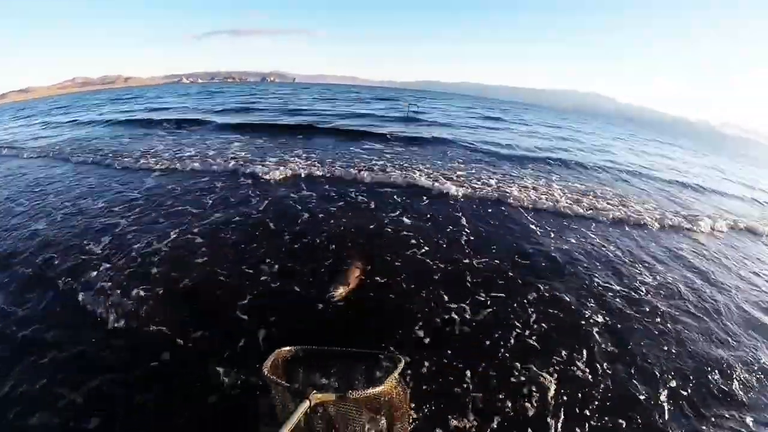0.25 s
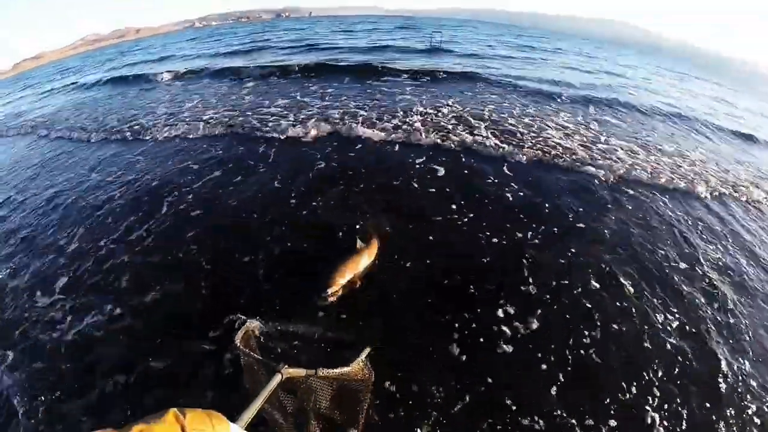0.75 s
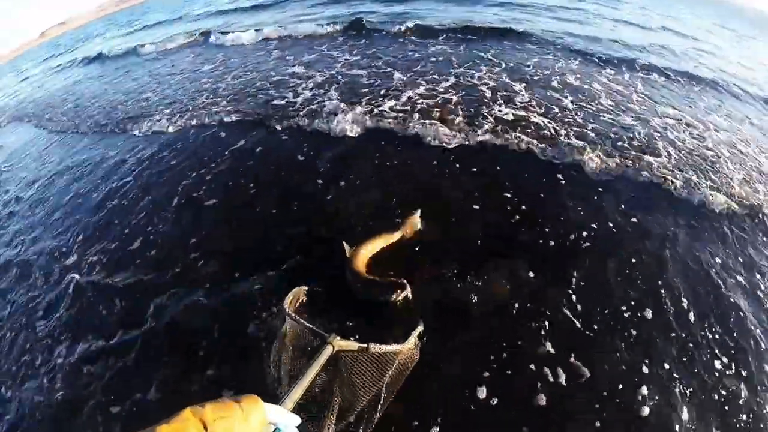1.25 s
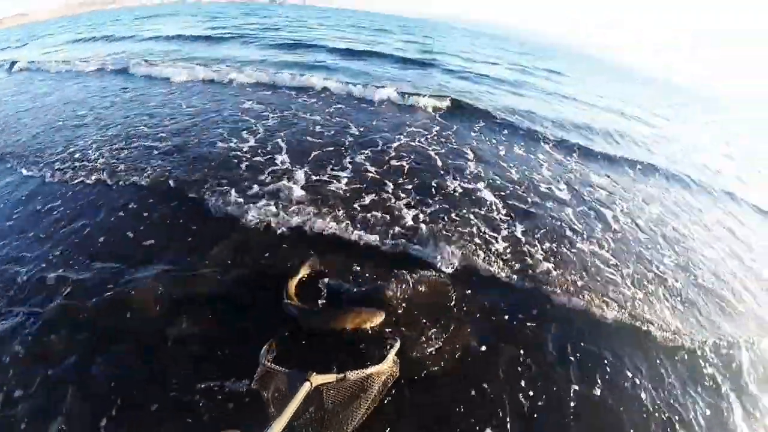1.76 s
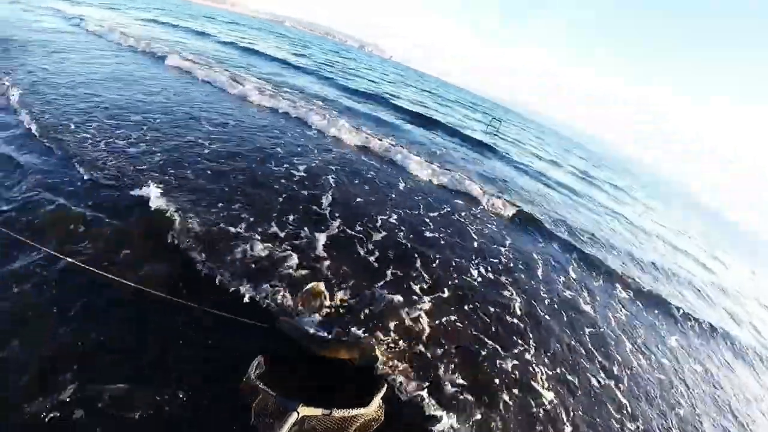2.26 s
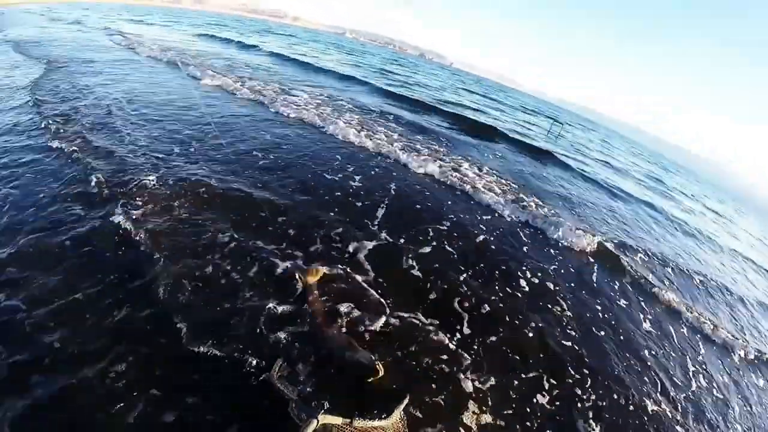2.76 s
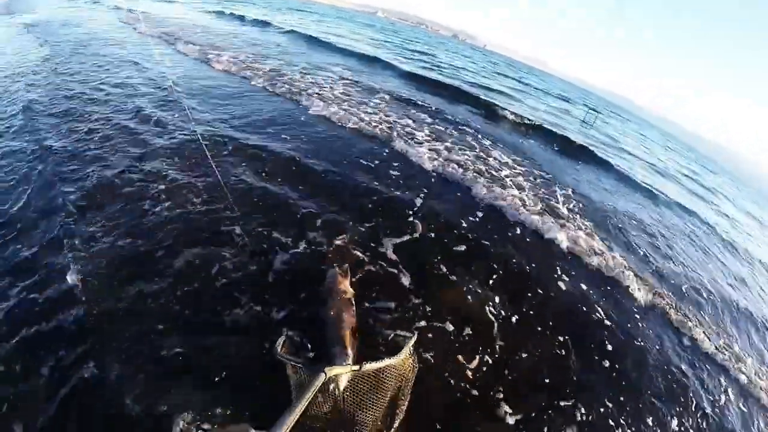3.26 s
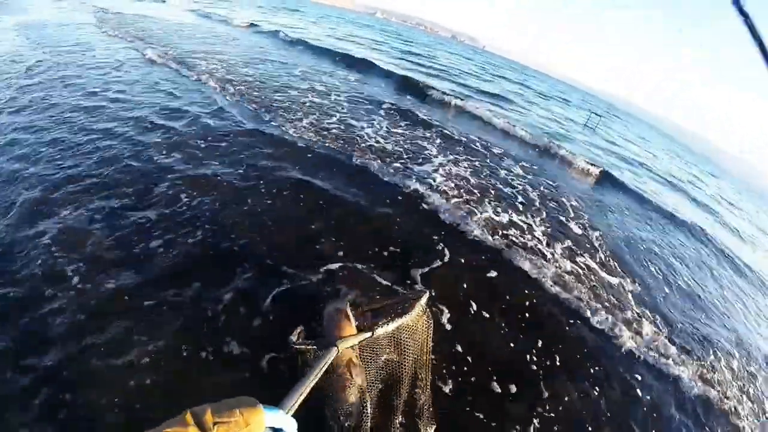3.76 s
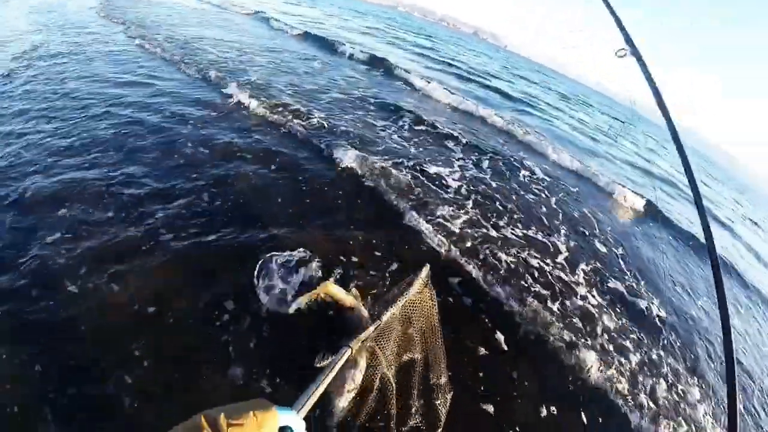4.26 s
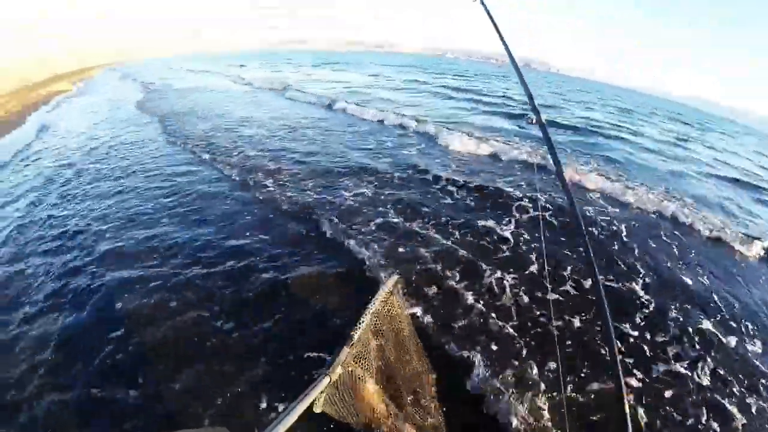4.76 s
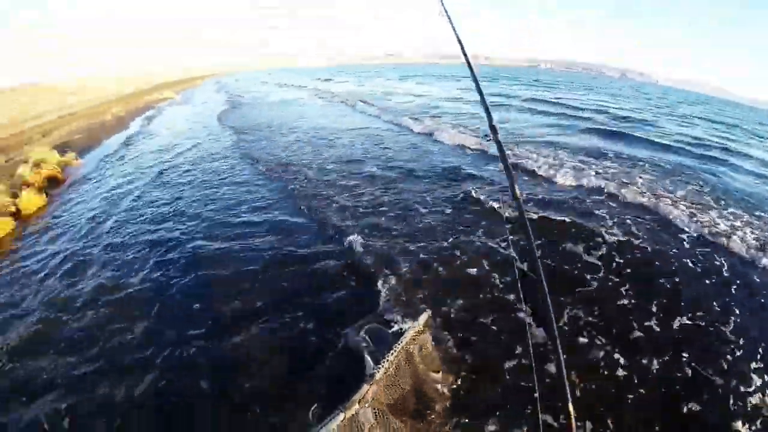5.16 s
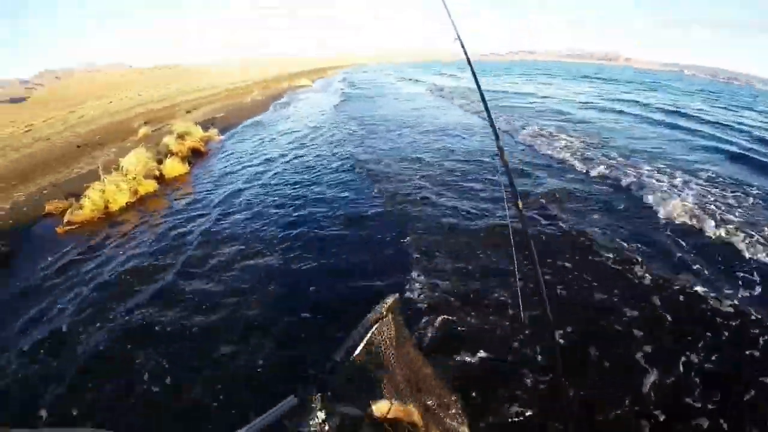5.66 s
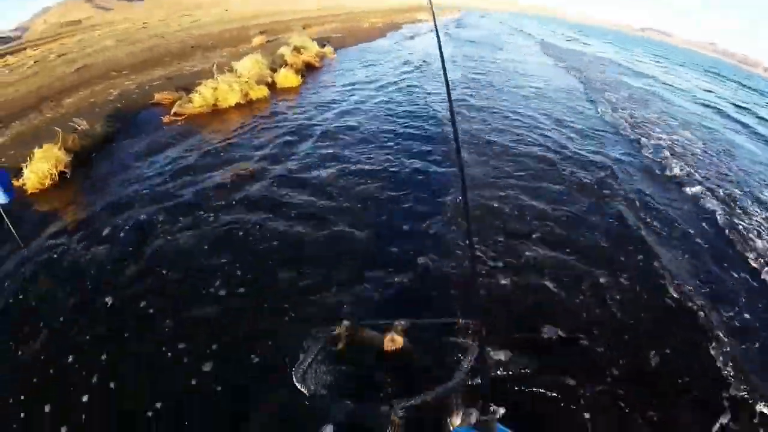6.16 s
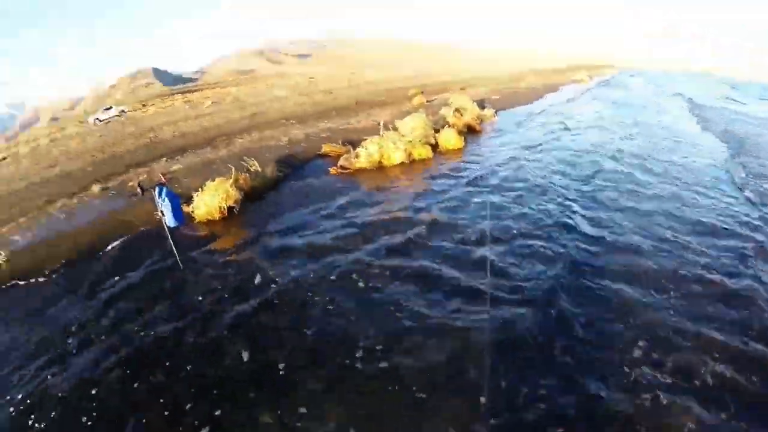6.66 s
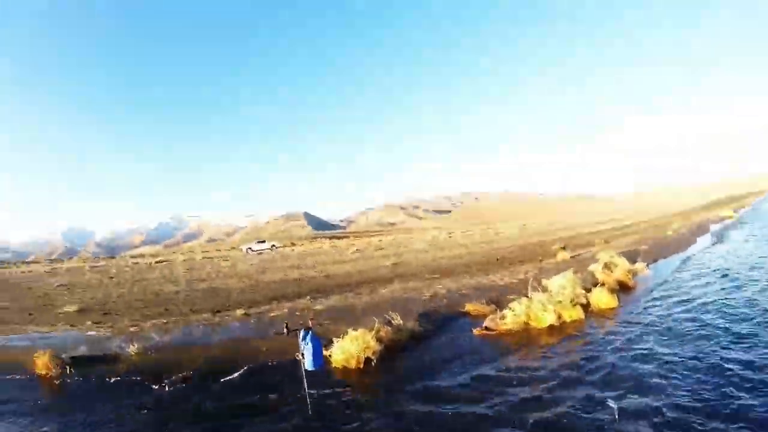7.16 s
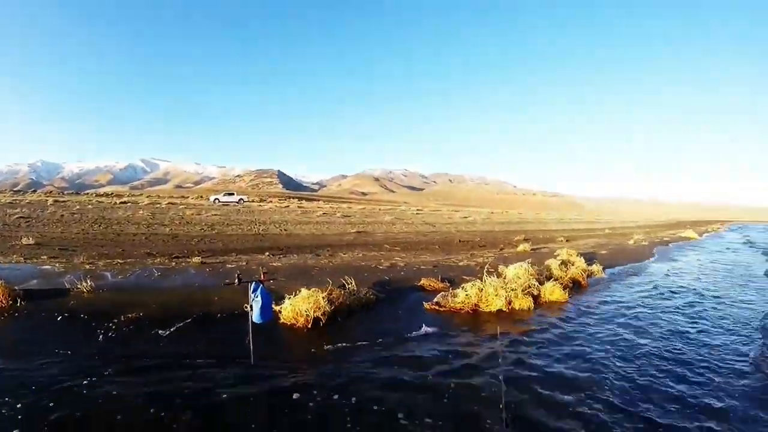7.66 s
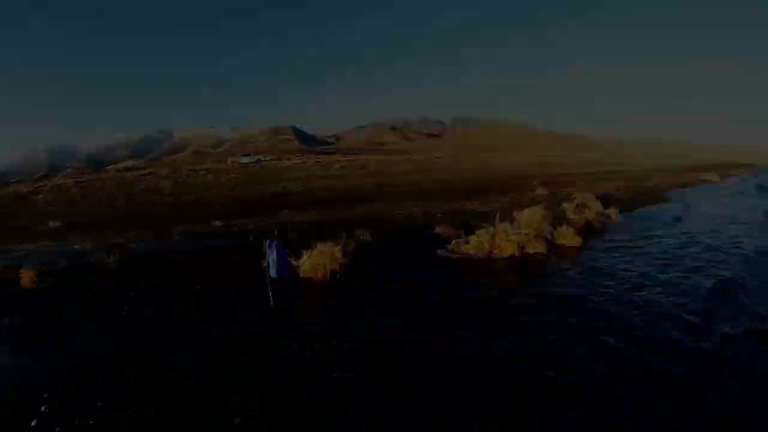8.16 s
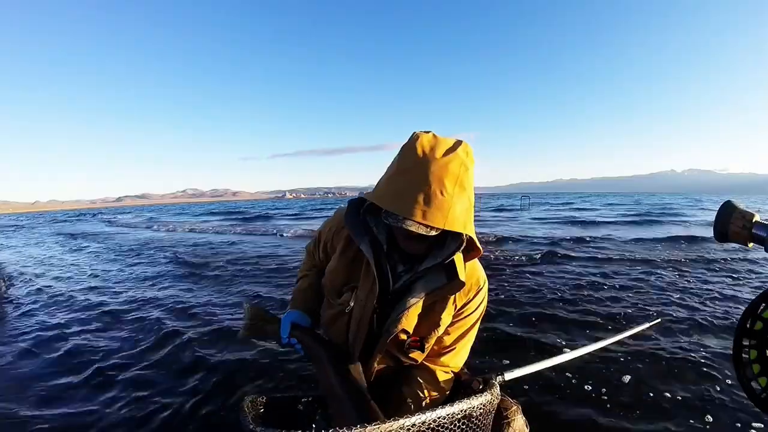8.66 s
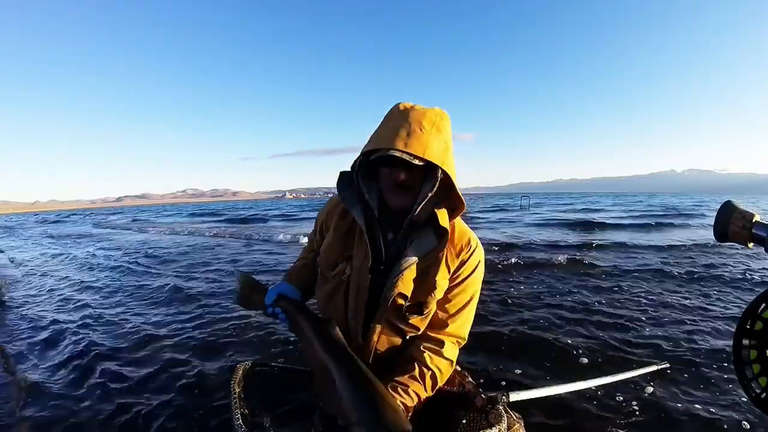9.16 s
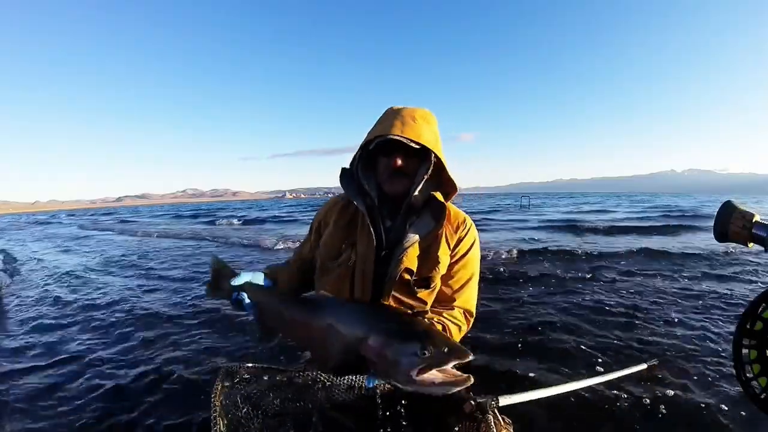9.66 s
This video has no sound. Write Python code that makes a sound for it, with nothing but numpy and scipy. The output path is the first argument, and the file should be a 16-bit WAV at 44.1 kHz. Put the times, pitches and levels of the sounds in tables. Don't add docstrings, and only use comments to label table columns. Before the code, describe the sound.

Foamy wavelets wash, splash and fizz around a wader while wind thumps a sealed microphone, then a quick fade gives way to softer water.

```python
import sys
import numpy as np
from scipy import signal
from scipy.io import wavfile
from scipy.ndimage import uniform_filter1d

SR = 44100
rng = np.random.default_rng(int(sys.argv[2]) if len(sys.argv) > 2 else 0)


def dump_mix(stems):
    frames = np.atleast_2d(stems).T
    limited = np.clip(frames, -1, 1)
    pcm = np.round(limited * 32767).astype(np.int16)
    wavfile.write(sys.argv[1], SR, pcm)


def voltage_ratio(decibels):
    exponent = np.asarray(decibels, float) / 20
    return 10 ** exponent


N = 437028

TURN_START_S, TURN_END_S = 5.33, 6.16
LOW_TURN_S = 4.63
CUT_S = 8.41
END_S, END_DB = 9.87, -4

# pitch in Hz, level in dB per Hz.
SURF_TONE = [(110, -42), (190, -1), (340, 2), (720, -4), (1150, -5.5), (1400, -15), (2130, -7),
             (2870, -13.5), (4290, -20), (5000, -14), (6050, -7), (7800, -11.5), (9600, -18), (12500, -40)]
SHORE_TONE = [(110, -16.5), (190, -2), (516, -1.5), (903, -3.5), (1480, -10.5), (2210, -6.5), (4370, -20),
              (5000, -14.5), (6050, -8), (7300, -12), (9000, -15.5), (12500, -44)]
CALM_TONE = [(110, -26), (190, -23), (222, -1.5), (464, -2.5), (842, -3), (1500, -12), (3420, -21.5),
             (4290, -30), (5000, -20), (6050, -16), (7500, -11), (9000, -17.5), (12500, -48)]
# pitch in Hz, width in Hz, lift in dB at the surf, shore and calm spot.
CASE_RINGS = [
    (5540, 620, 7, 6, 4.6),
    (6510, 340, 7.5, 10.6, 12.7),
    (7010, 960, 2, 1.3, 4.9),
    (6900, 410, 0.2, 1.5, 3.1),
]
# wash, splash and fizz in dB.
WATER_LEVELS = [
    (-43.5, -46.5, -45),
    (-49, -55, -52),
    (-47.5, -57.5, -52),
    (-55, -58.5, -55.5),
]
FOAM_FOLLOW = (1, 1.3, 1.35)
SHADE_START_S = (5.43, 5.55, 5.7)
# time in seconds, level in dB.
NEAR_FOAM = [(0, 1), (0.4, -1.5), (0.9, 0.5), (1.3, -1), (1.86, -0.5), (2.6, -.5), (3.1, -3), (3.6, -1),
             (4.3, 0.5), (5.0, 0), (5.6, -1), (6.0, 0), (6.6, 1), (7.3, 0), (7.9, 0.5), (8.45, -0.5),
             (9.2, 0.5), (9.7, 1.5)]
# middle in seconds, length in seconds, lift in dB, share reaching the splash (0-1).
FOAM_SURGES = [(0.1, 0.13, 3, 0.2), (0.22, 0.11, 4, 0), (0.425, 0.21, 5.5, 0.05), (0.6, 0.22, 4.5, 0.1),
               (0.88, 0.08, 7, 0), (0.96, 0.12, 7, 0.6), (1.728, 0.14, 5, 0.7), (1.996, .14, 0.5, 0.9),
               (2.25, 0.21, 7, 0.14), (2.386, 0.093, 5, 0.2), (2.674, 0.079, 5, 0.4), (2.877, 0.17, 5, 0.5),
               (3.33, 0.09, -1.5, 0.2), (3.454, .08, -0.5, .6), (3.967, 0.06, 2.5, 1), (4.138, 0.21, 2, .8),
               (4.45, 0.3, 4, 0.64), (4.74, 0.11, 3.5, 1), (5.229, 0.12, 1.5, 0.1), (5.413, 0.42, 4, 0),
               (5.55, .1, 0.5, 0.1), (5.717, 0.27, 3, 0.6), (5.875, 0.31, 3, 0.4), (6.273, 0.19, 2, 1),
               (6.946, 0.14, 3.5, 0.5), (7.07, 0.088, 1.5, .3), (7.68, .12, 2.5, 0), (7.8, 0.094, 1, 0),
               (8.62, .08, 4.5, 0), (9.57, 0.38, 3.5, 0.4)]
# middle in seconds, length in seconds, lift in dB.
LEG_LAPS = [(0.1, 0.061, 1), (0.403, 0.058, 7.5), (0.553, 0.11, 3), (0.74, 0.073, 2.5), (1.547, 0.056, 6),
            (1.953, 0.32, 2), (2.29, 0.38, 2.5), (4.174, 0.06, 1), (4.325, 0.085, 1.5), (4.482, 0.08, 2.5),
            (5.01, .1, 1.5), (5.61, 0.089, 0), (5.69, 0.072, 5), (6.5, 0.069, 0.5), (6.93, 0.41, 2),
            (7.687, 0.21, 1.5), (8.485, 0.087, 4.5), (8.638, 0.089, 2), (8.753, 0.089, 2), (9.135, 0.23, 2),
            (9.33, 0.091, 2), (9.562, 0.1, 4.5), (9.686, 0.16, 3), (9.852, 0.072, 4)]

# start in seconds, peak in dB, first and last Hz, length in seconds.
WATER_SLAPS = [(1.536, -18, 2000, 2800, .0026), (1.5364, -23, 3000, 4900, .0025),
               (1.534, -27, 770, 810, .008), (1.537, -26, 4800, 7600, .0022),
               (1.5385, -33, 6300, 5500, .003), (1.5358, -27, 1000, 1600, .0033),
               (1.5345, -56, 12000, 13600, .005), (0.583, -34, 2200, 3700, .003),
               (2.86, -28, 1600, 2800, .0035), (4.1465, -25, 410, 3000, .0033),
               (6.934, -42, 800, 1100, .006), (6.936, -47, 3520, 4500, .003),
               (7.157, -38.5, 4600, 6700, .0033), (8.985, -48, 5900, 6100, .007),
               (8.968, -52, 2800, 4500, .003), (9.762, -52, 4500, 3000, .005),
               (9.859, -53, 2400, 4000, .007), (9.863, -49, 4000, 6200, .006)]
# start in seconds, peak in dB, peak of the low part in dB.
DROP_SNAPS = [(0.2205, -27, -42), (0.455, -18, -39), (0.4814, -20.5, -42), (0.8704, -25, -35),
              (0.938, -21.5, -37), (0.9935, -28.5, -22), (1.535, -27.5, -32), (1.711, -29, -33.5),
              (2.1917, -22.5, -38.5), (2.2343, -24, -37), (2.2957, -17, -43), (2.43, -22.5, -44.5),
              (2.683, -13, -44), (2.6835, -27, -42.5), (2.8469, -25.5, -40.5), (3.319, -22, -43),
              (3.432, -24, -28), (3.685, -20, -40), (4.043, -24, -31), (4.146, -30.5, -24),
              (4.462, -18, -37), (4.722, -24, -38), (4.739, -22, -32), (5.343, -21, -37), (5.376, -19, -41),
              (5.3951, -21, -40), (5.512, -19.5, -35), (5.75, -21.5, -31.5), (5.876, -22, -41)]
# start in seconds, peak in dB.
NET_DRIPS = [(6.147, -27.5), (6.7072, -30), (6.977, -29), (7.0457, -34), (7.1013, -41), (7.1213, -37),
             (7.1572, -37), (7.675, -32), (7.7797, -30.5), (8.4183, -43), (8.599, -26), (8.6655, -32),
             (8.8477, -34), (8.8872, -32), (8.9508, -50), (8.967, -28), (8.9845, -40), (9.1472, -39.5),
             (9.218, -28), (9.394, -31), (9.441, -33), (9.4876, -27.5), (9.5594, -24.5), (9.6285, -29),
             (9.7069, -34), (9.7748, -44), (9.865, -24.5)]
# start in seconds, peak in dB, pitch in Hz.
FOAM_TICKS = [(0.5492, -30, 6600), (0.5686, -20, 6530), (0.8395, -21, 6500), (0.904, -19, 6450),
              (1.1318, -21, 6660), (2.168, -18.5, 5600), (2.252, -27, 6200), (2.37, -19, 5940),
              (2.6637, -20, 6450), (2.7871, -21, 6360), (3.4201, -26, 6440), (3.4665, -22, 5850),
              (3.9549, -20, 6500), (4.0337, -20, 6570), (4.5421, -26, 6400), (4.782, -22, 6450),
              (5.2165, -22, 6500), (5.2545, -25, 6580), (5.2609, -18, 6560), (5.3272, -21, 6460),
              (5.3617, -20, 5540), (5.4331, -21, 6300), (5.463, -18, 6450), (5.4914, -22, 6510),
              (5.6206, -21, 5750), (5.8072, -26, 5650), (5.8187, -20, 6510), (5.8476, -21, 5700),
              (7.9105, -32, 6440), (7.9902, -25, 5750), (8.6114, -30, 6640), (8.7201, -40, 6470),
              (8.8278, -33, 6810), (9.3177, -35, 6490), (9.3945, -34, 6400)]
# start in seconds, peak in dB, pitch in Hz.
BUBBLE_GLUGS = [(1.867, -28, 255), (2.289, -36.5, 368), (3.44, -28, 245), (4.168, -25, 542),
                (4.2, -31.5, 402), (4.606, -31, 402), (5.615, -25.5, 274), (5.669, -26.5, 450),
                (8.612, -36, 385), (8.636, -36, 1000), (8.641, -39, 262), (8.731, -39, 732),
                (8.751, -38, 326), (8.782, -39, 1350), (9.03, -42, 437), (9.115, -37, 1200),
                (9.145, -38, 690), (9.537, -36, 476), (9.63, -35, 530), (9.687, -31.5, 440),
                (9.797, -40, 607)]

# pitch in Hz, level in dB per Hz.
THUMP_TONE = [(12, -22), (22, -6), (35, -2), (50, 0), (65, -5), (110, -30), (300, -90)]
FLUTTER_TONE = [(20, -55.5), (40, -23), (65, 0), (90, 0.5), (150, -7), (220, -13.5), (400, -36), (900, -98)]
# time in seconds, thump in dB, flutter over thump in dB.
STEADY_BREEZE = [(0, -51, 15), (0.42, -59, 3.5), (1.2, -52, -1), (1.5, -41.5, 4.5), (1.9, -54.5, -3.5),
                 (2.4, -58, 3.5), (2.8, -59, -1.5), (3.15, -39.5, -5.5), (3.5, -35.5, 3), (4.07, -34, -1),
                 (4.13, -46, -4), (4.6, -42, -3.5), (4.9, -53, -4), (5.9, -56, -3), (6.4, -58, 0.5),
                 (7.9, -55, -3.5), (8.42, -57, -0.5), (9.9, -62, 0)]
# middle in seconds, length in seconds, thump in dB, flutter over thump in dB.
CASE_GUSTS = [(0.11, 0.12, -48, 14), (0.187, 0.062, -44.5, 15), (0.291, 0.071, -43, 5),
              (0.63, 0.17, -42.5, -4), (0.83, 0.073, -51, 11.5), (1.38, 0.14, -34.5, -7.5),
              (1.568, 0.14, -31.5, -13.5), (1.655, 0.11, -33.5, -10), (1.787, 0.16, -44, -8),
              (1.98, 0.12, -34.5, -5), (2.806, 0.062, -50, 7.5), (2.884, 0.059, -42, 0),
              (2.988, 0.2, -37, -4.5), (3.265, 0.12, -41.5, 6), (3.393, 0.034, -37, 9.5),
              (3.45, 0.077, -37, 4.5), (3.502, 0.045, -49, -1), (3.594, 0.041, -33, 2.5),
              (3.713, 0.069, -44, 8), (3.85, 0.083, -27.5, 2), (3.955, 0.19, -29, -33), (4.053, .1, -32, 0),
              (4.19, 0.074, -33, -11), (4.366, 0.36, -40, 0), (4.542, 0.11, -38, -2.5),
              (4.608, 0.077, -40, -14), (6.91, 0.19, -38.5, -13), (7.064, 0.15, -40, -14),
              (7.803, 0.1, -39, -22), (8.735, .06, -50, -4), (8.778, .04, -43, -6), (8.915, .09, -51, -5),
              (8.975, 0.059, -41, -9), (9.143, .05, -47, -1), (9.4, 0.43, -61, 2)]
# pitch in Hz, level in dB per Hz.
SWAY_TONE = [(10, -16), (20, 4.5), (28, 2.5), (45, -12.5), (70, -26.5), (300, -92.5)]
DRONE_TONE = [(30, -30.5), (70, 0), (125, 3.5), (145, -9.5), (170, -28), (400, -85)]
# start in seconds, length in seconds, level in dB, pitch in Hz.
BIRD_PEEPS = [
    (7.653, 0.055, -66, 9200),
    (7.782, 0.046, -50, 9170),
]

# pitch in Hz, dB under the loud bands where it vanishes.
LOST_TREBLE = [(8500, 50), (9500, 32), (10500, 28.5), (11500, 29), (12300, 29), (13200, 26), (13600, 15)]
# time in seconds, level in dB.
SCENE_FADE = [
    (7.9, 3.5),
    (8.0, -6),
    (8.1, -20),
    (8.2, -30.5),
    (8.26, -39),
    (8.28, -49),
    (8.335, -56),
    (8.408, -85),
    (8.412, -15),
    (8.426, 2.5),
]


def water():
    far = rng.standard_normal(N)
    near = pops(4000, 2.6, 3.8)
    spray = pops(3000, 1.4, 6.4)
    crackle = pops(350, 2.6, 3.5) * np.where(after_cut(), .8, .35)
    wash_bubbles = bubbles(200, 295.0, 1397, 4.74)
    wash = evened(far * voltage_ratio(1.4 * drift(12)) + 0.52 * near + 0.089 * wash_bubbles)
    splash_bubbles = bubbles(400, 1405, 4350, 3.9)
    splash = evened(far + 0.62 * near + 0.6 * crackle + 0.15 * splash_bubbles)
    boil = voltage_ratio(swells(FOAM_SURGES, np.array(FOAM_SURGES)[:, 2]))
    fizz_bubbles = bubbles(1500, 4300, 9760, 8.1)
    fizz = evened(0.75 * far / boil + 0.32 * near + 0.68 * spray + crackle + 0.28 * fizz_bubbles)
    return (voltage_ratio(layer_db(0)) * heard(wash, 0, 1400, LOW_TURN_S)
            + voltage_ratio(layer_db(1)) * heard(splash, 1400, 4300)
            + voltage_ratio(layer_db(2)) * heard(fizz, 4300, 3e4))


def pops(per_s, spread_db, clump_db):
    size_db = spread_db * np.minimum(rng.exponential(1, N), 3) + clump_db * np.tanh(drift(35))
    sign = rng.choice([-1., 1.], N)
    bursts = rng.random(N) < per_s / SR
    return evened(voltage_ratio(size_db) * sign * bursts)


def bubbles(per_s, lo_hz, hi_hz, cycles, count=24):
    out, rings = np.zeros(N), []
    for hz in np.geomspace(lo_hz, hi_hz, count):
        turns = np.arange(int(3 * cycles * SR / hz)) * hz / SR
        shape = np.exp(-turns / cycles) * np.minimum(turns / 1.2, 1)
        ring = shape * np.sin(2 * np.pi * turns * (1 + .012 * turns))
        rings.append(ring / np.linalg.norm(ring))
    born = rng.random(N) < per_s / SR
    which = rng.integers(0, count, N)
    size = rng.exponential(1, N)
    for at in np.flatnonzero(born):
        add(out, at / SR, voltage_ratio(3.65 * min(size[at], 3)) * rings[which[at]])
    return evened(out) * np.where(after_cut(), voltage_ratio(5), 1)


def layer_db(index):
    surf, shore, away, calm = np.array(WATER_LEVELS)[:, index]
    facing = along([(SHADE_START_S[index], surf), (TURN_END_S, shore), (SCENE_FADE[0][0], away),
                    (CUT_S, away), (CUT_S, calm), (END_S, calm), (N / SR, calm + END_DB)])
    surge, lap = np.array(FOAM_SURGES), np.array(LEG_LAPS)
    if index == 0:
        lift = swells(LEG_LAPS, lap[:, 2])
    elif index == 1:
        lift = swells(FOAM_SURGES, surge[:, 2] * surge[:, 3])
    else:
        lift = swells(FOAM_SURGES, surge[:, 2])
    return facing + FOAM_FOLLOW[index] * along(NEAR_FOAM) + lift


def heard(source, lo_hz, hi_hz, turn_s=TURN_START_S):
    turned = np.interp(np.arange(N) / SR, (turn_s, TURN_END_S), [0, 1])
    calm = after_cut()
    shares = np.sqrt(1 - turned), np.sqrt(turned) * ~calm, calm
    drives = source, np.roll(source, SR), source
    out = np.zeros(N)
    for view, tone in enumerate((SURF_TONE, SHORE_TONE, CALM_TONE)):
        case = colour(tone, lo_hz, hi_hz, view=view)
        out += shares[view] * signal.oaconvolve(drives[view], case)[:N]
    return out


def patchy(x):
    hz, t, z = signal.stft(x, SR, nperseg=512, noverlap=384)
    field = rng.standard_normal(z.shape)
    for size, axis in ((7, 0), (7, 0), (11, 1), (11, 1)):
        field = uniform_filter1d(field, size, axis)
    depth_db = np.where(t > CUT_S, 1.9, 1.14) * np.interp(hz, (800, 3000), (.3, 1))[:, None]
    lift = voltage_ratio(depth_db * evened(field) - .115 * depth_db ** 2)
    return signal.istft(z * lift, SR, nperseg=512, noverlap=384)[1][:N]


def slaps():
    out = np.zeros(N)
    puffs = rng.standard_normal((len(WATER_SLAPS), 400))
    for (s, db, from_hz, to_hz, length), puff in zip(WATER_SLAPS, puffs):
        hz = np.geomspace(from_hz, to_hz, int(length * SR))
        ragged = 1 + .3 * evened(uniform_filter1d(puff, size=12))[:len(hz)]
        sweep = np.sin(2 * np.pi * np.cumsum(hz) / SR)
        add(out, s, voltage_ratio(db) * ragged * signal.windows.tukey(len(hz), .7) * sweep)
    return out


def drops():
    out, t = np.zeros(N), np.arange(256) / SR
    main, low, air = (colour(SURF_TONE, lo, hi, view=0)[:600]
                      for lo, hi in ((5500, 8200), (1400, 4300), (7500, 14000)))
    puffs = rng.standard_normal((len(DROP_SNAPS), 256))
    for (s, peak_db, low_db), puff in zip(DROP_SNAPS, puffs):
        burst = puff * t * np.exp(-t / 0.00087)
        for db, band in ((peak_db - 4, main), (low_db - 6, low), (peak_db - 22 - 4, air)):
            ring = np.convolve(burst, band)
            add(out, s, voltage_ratio(db) * ring / abs(ring).max())
    case = colour(CALM_TONE, 5600, size=1024, view=2)
    puffs = rng.standard_normal((len(NET_DRIPS), 256))
    for (s, db), puff in zip(NET_DRIPS, puffs):
        ring = np.convolve(puff * t * np.exp(-t / 0.00097), case)
        add(out, s, voltage_ratio(db - 5.5) * ring / abs(ring).max())
    return out


def ticks():
    out, t = np.zeros(N), np.arange(400) / SR
    peak_s = .0012
    shape = t / peak_s * np.exp(1 - t / peak_s)
    puffs = rng.standard_normal((len(FOAM_TICKS), 400))
    for (s, db, hz), puff in zip(FOAM_TICKS, puffs):
        rough = 1 + 0.37 * evened(uniform_filter1d(puff, size=14))
        add(out, s, voltage_ratio(db - 6.5) * shape * rough * np.sin(2 * np.pi * hz * t) / 2)
    return out


def glugs():
    out = np.zeros(N)
    for s, db, hz in BUBBLE_GLUGS:
        turns = np.arange(int(16 * SR / hz)) * hz / SR
        shape = turns / 2.0 * np.exp(1 - turns / 1.73)
        ring = np.sin(2 * np.pi * turns * (0.904 + 0.0088 * turns))
        add(out, s, voltage_ratio(db - 6.5) * shape * ring)
    return out


def wind():
    thump = eddies(THUMP_TONE, .8, size=2200)
    flutter = eddies(FLUTTER_TONE, .8, size=1600)
    flutter = evened(flutter * (1 + 0.34 * np.tanh(thump)))
    push_db, gust = along(STEADY_BREEZE), np.array(CASE_GUSTS)
    thump_size = voltage_ratio(push_db) + swells(CASE_GUSTS, voltage_ratio(gust[:, 2] - 2.0))
    flutter_size = voltage_ratio(push_db + along(STEADY_BREEZE, index=2))
    flutter_size += swells(CASE_GUSTS, voltage_ratio(gust[:, 2] + gust[:, 3] - 3.0))
    push = thump_size * thump + flutter_size * flutter
    crest = push ** 2 - uniform_filter1d(push ** 2, size=2200)
    return push + 1.3 * crest


def eddies(points, steady, size):
    x = signal.oaconvolve(rng.standard_normal(N), colour(points, size=32768))[:N]
    power = uniform_filter1d(uniform_filter1d(x ** 2, size), size)
    swell = np.sqrt(abs(power) + 1e-9)
    return evened(x / swell ** steady)


def lull():
    calm = after_cut()
    sway = eddies(SWAY_TONE, .5, size=3000)
    drone = eddies(DRONE_TONE, .3, size=1600)
    return voltage_ratio(np.where(calm, -62, -50)) * sway + voltage_ratio(-56) * calm * drone


def bird():
    out = np.zeros(N)
    for s, length, db, hz in BIRD_PEEPS:
        t = np.arange(int(length * SR)) / SR
        fall = voltage_ratio(db - 8 * t / length)
        add(out, s, fall * signal.windows.tukey(len(t), .2) * np.sin(2 * np.pi * hz * t))
    return out


def after_cut():
    return np.arange(N) > CUT_S * SR


def evened(x):
    return x / np.sqrt(np.mean(x ** 2) + 1e-20)


def add(mix, s, sound):
    part = mix[round(s * SR):][:len(sound)]
    part += sound[:len(part)]


def drift(hz):
    return evened(signal.sosfilt(signal.butter(2, hz, fs=SR, output="sos"), rng.standard_normal(N)))


def along(points, index=1):
    rows = np.array(points)
    return np.interp(np.arange(N) / SR, rows[:, 0], rows[:, index])


def swells(rows, heights):
    out = np.zeros(N)
    for (s, length, *_), height in zip(rows, heights):
        add(out, max(s - length / 2, 0), height * np.hanning(int(max(length, .02) * SR)))
    return out


def colour(points, lo_hz=0., hi_hz=3e4, size=8192, view=None):
    hz = abs(np.fft.fftfreq(size, 1 / SR)) + 1
    f, db = np.transpose(points)
    db = np.interp(np.log(hz), np.log(f), db)
    if view is not None:
        for ring in CASE_RINGS:
            db = db + ring[2 + view] / (1 + (2 * (hz - ring[0]) / ring[1]) ** 2)
    gain = voltage_ratio(db) / np.sqrt((1 + (lo_hz / hz) ** 12) * (1 + (hz / hi_hz) ** 12))
    log_gain = np.log(gain + 1e-5)
    taps = np.fft.ifft(np.exp(np.conj(signal.hilbert(log_gain)))).real[:size // 2]
    return taps / np.linalg.norm(taps)


def lose_faint_treble(x, size=7):
    hz, t, z = signal.stft(x, SR, nperseg=2048, noverlap=1024)
    bands = len(hz) // size
    power = (abs(z[0, :bands * size]) ** 2).reshape(bands, size, -1).mean(1)
    centre_hz = hz[:bands * size].reshape(bands, size).mean(1)
    loud_db = 10 * np.log10(power[(centre_hz > 300) & (centre_hz < 8000)].mean(0) + 1e-20)
    under_db = loud_db - 10 * np.log10(power + 1e-20) + 3 * rng.standard_normal(power.shape)
    gust_db = 10 * np.log10(uniform_filter1d(power[0], size) + 1e-20) - loud_db - 16.5
    under_db += .45 * np.maximum(gust_db, 0) * (centre_hz[:, None] > 11600)
    kept = under_db < np.interp(centre_hz, *np.transpose(LOST_TREBLE))[:, None]
    kept[centre_hz < 8500] = True
    z[:, :bands * size] *= np.repeat(kept, size, 0)
    return signal.istft(z, SR, nperseg=2048, noverlap=1024)[1][:, :N]


def scene():
    lake = water()
    mono = wind() + lull() + drops() + slaps() + glugs() + bird() + ticks() + patchy(lake)
    return np.array([mono, mono])


def top_cut(x):
    return signal.sosfilt(signal.butter(12, 13730, fs=SR, output="sos"), x)


def record(dry):
    hiss_tone = colour([(1000, 0.0029), (9000, 0.0022)], 5200, 13000)
    hiss = signal.oaconvolve(rng.standard_normal(N), hiss_tone)[:N]
    camera = lose_faint_treble(dry + voltage_ratio(-69.5) * hiss)
    calm = np.arange(N) > (CUT_S + .13) * SR
    treble = signal.lfilter(*signal.butter(1, 5000, "high", fs=SR), np.roll(camera[0], 300))
    treble = treble + .07 * np.roll(camera[0], 900)
    side = voltage_ratio(-23 + 9.1 * drift(15)) * calm * treble * np.array([[1], [-1]])
    edit = np.round((camera + side) * voltage_ratio(along(SCENE_FADE)) * 2 ** 15) / 2 ** 15
    return top_cut(edit)


dry = scene()
out = record(dry)
dump_mix(out)
```